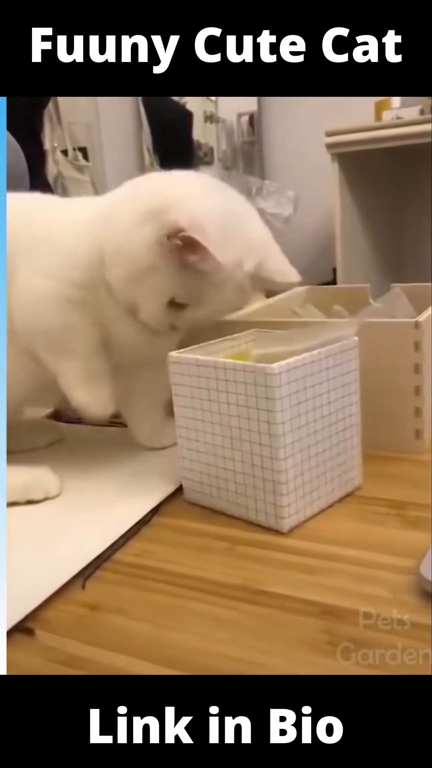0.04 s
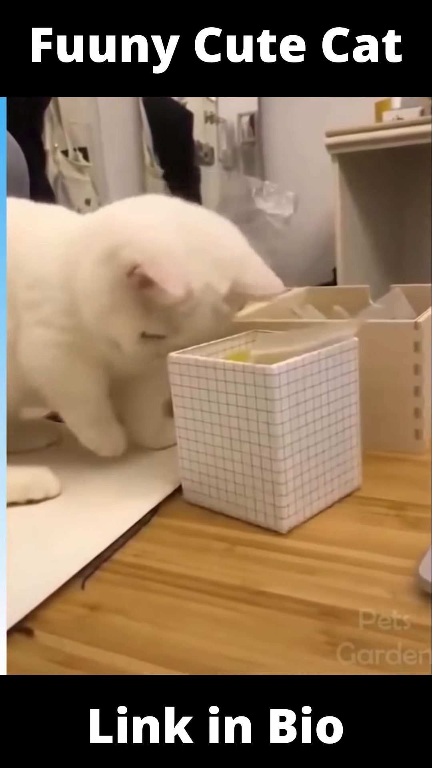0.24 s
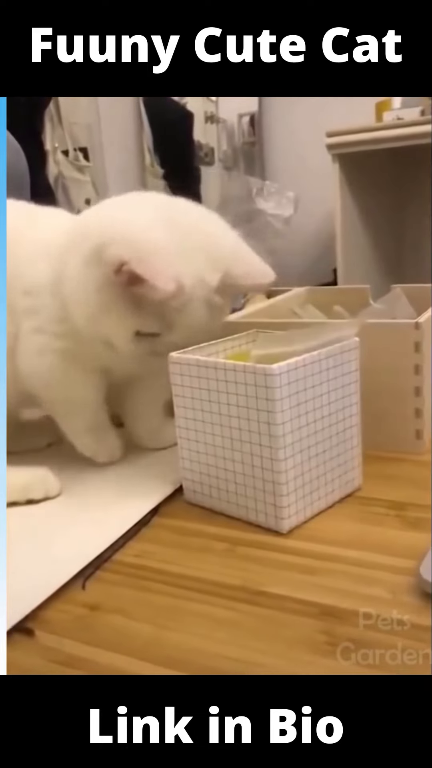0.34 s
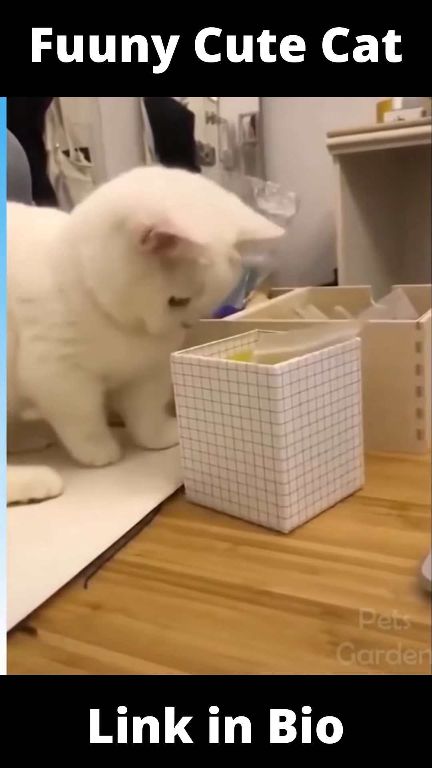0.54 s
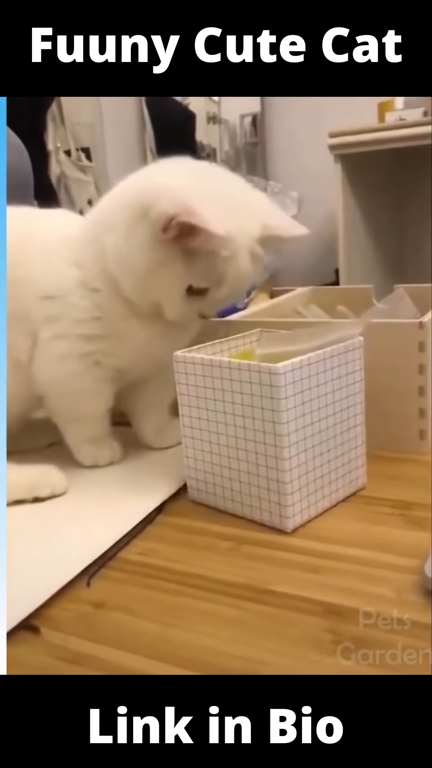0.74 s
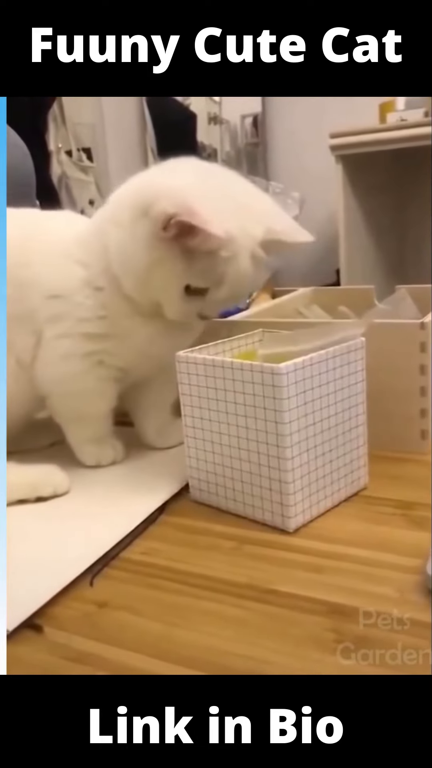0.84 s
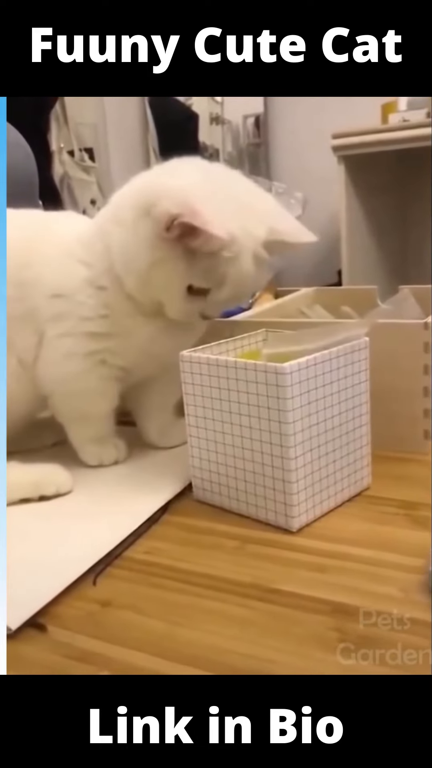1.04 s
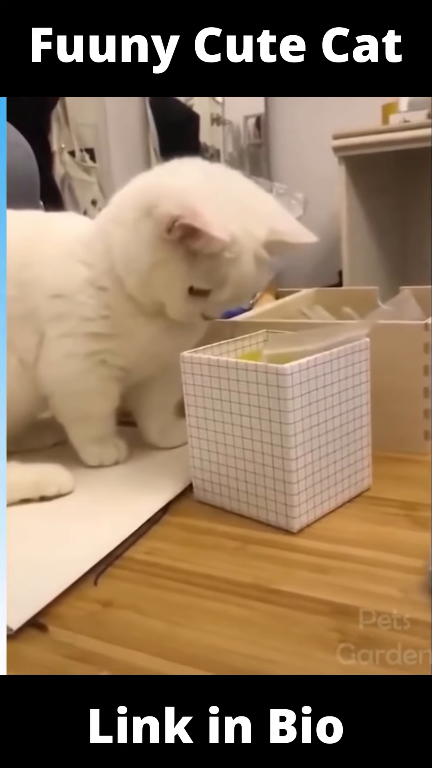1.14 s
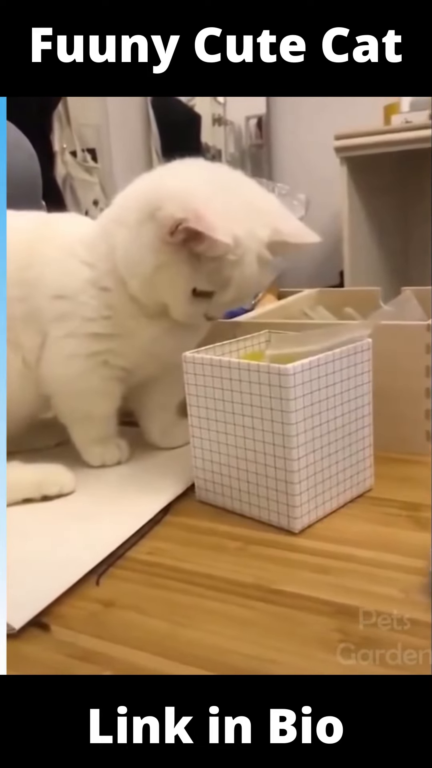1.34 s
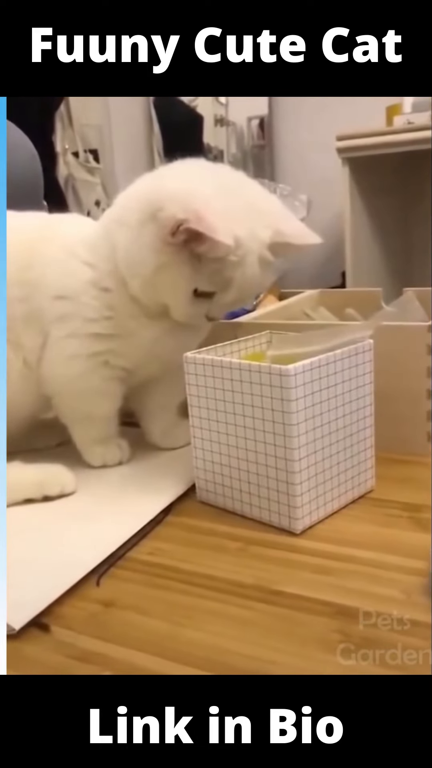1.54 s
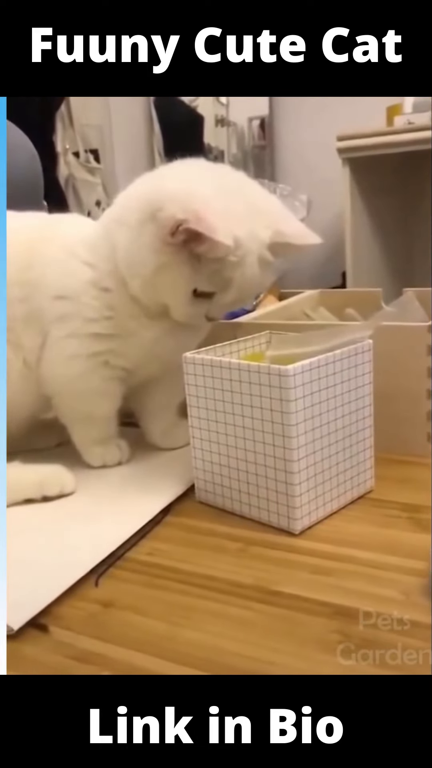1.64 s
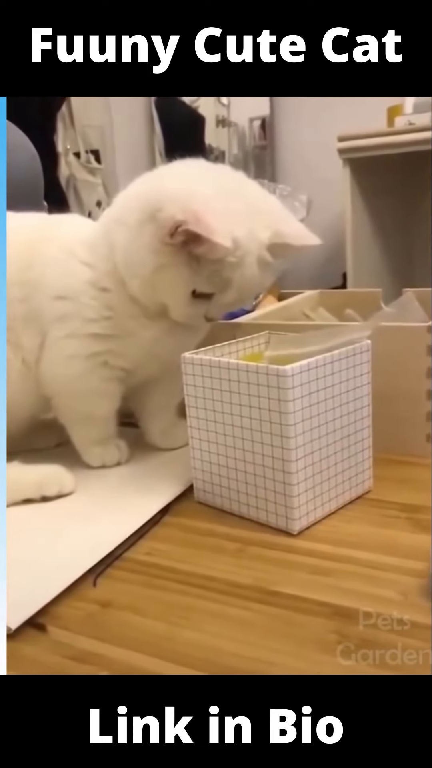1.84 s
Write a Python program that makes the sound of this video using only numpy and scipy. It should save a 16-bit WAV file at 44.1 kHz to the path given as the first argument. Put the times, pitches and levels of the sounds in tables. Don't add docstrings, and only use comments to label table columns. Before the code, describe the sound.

A small cardboard box knocks down on a wooden desk, a hard toy rattling inside it

```python
import sys
import numpy as np
from scipy import signal
from scipy.fft import rfft, irfft
from scipy.io import wavfile
from scipy.ndimage import uniform_filter1d

SR = 44100
rng = np.random.default_rng(int(sys.argv[2]) if len(sys.argv) > 2 else 0)


def master(y):
    cut = np.clip(np.atleast_2d(y).T, -1, 1)
    pcm = np.round(cut * 32767)
    wavfile.write(sys.argv[1], SR, pcm.astype(np.int16))


def elevation(decibels):
    levels = np.asarray(decibels, float)
    return 10 ** (levels / 20)


N = 83790

# mode_hz, level_db, t60_s
TOY = [(900, 0.5, 0.015), (1273, -5, 0.019), (1720, 2, 0.022), (1940, -2, 0.033), (2150, -2, 0.013),
       (2600, -2, 0.0096), (2990, -6, 0.032), (3773, -3, 0.021), (4240, -8, 0.012), (5150, -25, 0.01),
       (6140, -8, 0.0057), (7780, -33, 0.008), (9230, -24, 0.008)]


def evened(x):
    return x / np.sqrt(np.mean(x ** 2) + 1e-20)


def read(points, hz):
    f, value = np.transpose(points)
    return np.interp(np.log(hz + 1), np.log(f + 1), value)


def colour(x, points):
    gain = elevation(read(points, np.fft.rfftfreq(len(x), 1 / SR)))
    return irfft(rfft(x) * gain, len(x))


def add(mix, start_s, sound):
    part = mix[round(start_s * SR):][:len(sound)]
    part += sound[:len(part)]


def band(x, hz, width_hz):
    r = np.exp(-np.pi * width_hz / SR)
    return signal.lfilter([1, 0, -1], [1, -2 * r * np.cos(2 * np.pi * hz / SR), r * r], x)


def ring(modes, t, gain_db=0):
    hz, level_db, t60_s = np.transpose(modes)[:, :, None]
    decay_db = -60 * t / np.maximum(t60_s, .003)
    return elevation(level_db + gain_db + decay_db) * np.sin(2 * np.pi * hz * t)


def burst(points, t60_s, noise):
    t = np.arange(len(noise)) / SR
    return evened(colour(noise, points)) * elevation(-60 * t / t60_s) * np.minimum(t * 1500, 1)


def air():
    # freq_hz, level_db
    hiss_colour = [(100, 2.5), (250, 1), (450, -7.5), (1000, -4.5), (2200, -18), (5000, -24.5),
                   (13000, -26.5), (13600, -76)]
    # freq_hz, level_db
    rumble_colour = [(12, -39), (22, -0.5), (43, -3.5), (60, -3), (77, -7.5), (100, -23), (200, -58)]
    hiss_db, patchy_db, rumble_db = -60.5, 1.3, -54.5
    hum_hz, hum_db, hum_wobble, octave_db = 135, -53, 0.074, -18.5

    _, _, z = signal.stft(rng.standard_normal(N), SR, nperseg=512)
    patches = uniform_filter1d(rng.standard_normal(z.shape), 6, 0)
    patches = evened(uniform_filter1d(patches, 8, 1))
    patchy = signal.istft(z * elevation(patchy_db * patches), SR, nperseg=512)[1][:N]
    hiss = colour(patchy, hiss_colour)
    hiss /= np.std(signal.lfilter(*signal.butter(4, 200, "high", fs=SR), hiss))

    rumble = evened(colour(rng.standard_normal(N), rumble_colour))

    slow = uniform_filter1d(rng.standard_normal((2, N)), 3000)
    slow = evened(uniform_filter1d(slow, 3000))
    phase = 2 * np.pi * hum_hz * np.arange(N) / SR + hum_wobble * slow[0]
    tones = np.sin(phase) + elevation(octave_db) * np.sin(2 * phase)
    hum = np.sqrt(2) * (1 + hum_wobble * slow[1]) * tones
    return elevation(hiss_db) * hiss + elevation(rumble_db) * rumble + elevation(hum_db) * hum


def rattle():
    # time_s, level_db, tilt_db_per_octave
    shake = [(0, -59, 2), (0.049, -75, -8), (0.152, -68.5, -9), (0.202, -80.5, -14), (0.219, -50.5, -3),
             (0.242, -60, -10.5), (0.26, -54, 10), (0.29, -25.5, 3.5), (0.302, -32, -0.5),
             (0.357, -40, -0.5), (.42, -53.5, -5.5), (0.499, -52.5, -2.5), (0.599, -56.5, -1),
             (.66, -63, -1.5), (.72, -63.5, -1), (.77, -73, -9), (.81, -66.5, -4), (1.0, -78.5, -5)]
    # freq_hz, level_db
    rustle_colour = [(200, 0.5), (700, -1.5), (2000, 0.5), (4200, 0), (6500, -9.5), (9000, -13),
                     (12500, -15.5), (15000, -52)]
    hits_per_s, spread_db, rustle_db = 900, 4.5, 2

    t = np.arange(N) / SR
    time_s, level_db, tilt_db = np.transpose(shake)
    level_db = np.interp(t, time_s, level_db, left=-120, right=-120)
    tilt_db = np.interp(t, time_s, tilt_db, left=-120, right=-120)
    tilt_db = np.clip(tilt_db, -9, 9)

    hits = elevation(spread_db * np.minimum(rng.exponential(1, N), 2.5))
    hits = hits * (rng.random(N) < hits_per_s / SR) * rng.choice([-1, 1], N)

    which = rng.integers(0, len(TOY), (2, N))
    taps = ring(TOY, t[:2000]) * elevation(-1500 * t[:2000])
    parts = [signal.oaconvolve(hits * (which == k).any(0), tap)[:N] for k, tap in enumerate(taps)]
    tilted = sum(p * elevation(tilt_db * np.log2(mode[0] / 2500)) for p, mode in zip(parts, TOY))
    toy = tilted / np.std(sum(parts))

    paper = evened(colour(hits + 0.28 * rng.standard_normal(N), rustle_colour))
    dull = signal.lfilter(*signal.butter(1, 2500, fs=SR), paper)
    paper = dull * elevation(-tilt_db) + (paper - dull) * elevation(tilt_db)
    return elevation(level_db) * (toy + elevation(rustle_db) * paper)


def slips():
    # start_s, peak_db, centre_hz, ring_over_puff_db, t60_s
    events = [(0.075, -49, 3600, 3, .02), (0.0835, -37, 3700, -4, 0.0097), (0.0985, -39.5, 3700, -9, 0.026),
              (0.1114, -38.5, 3520, -15, 0.014), (.124, -42, 4100, -5.5, 0.018),
              (0.1338, -39, 2050, -5, 0.024), (0.14, -54, 4000, -13, 0.017),
              (0.151, -37.5, 4040, -7, 0.027), (0.156, -38.5, 1950, 1, 0.024),
              (0.1671, -28.5, 4630, 5.5, 0.011), (0.18, -39, 4500, -2, 0.011),
              (0.1836, -27, 6640, -4, 0.017), (0.2114, -34, 4500, 1, 0.012), (0.214, -36, 2400, 13, 0.034),
              (.218, -30.5, 1300, 8, .04), (.222, -43, 2300, 5.5, .03), (0.226, -42, 12500, 9, 0.023),
              (0.2274, -34.5, 4350, -8, 0.01), (0.229, -30, 1850, 0, 0.015), (0.68, -58, 11500, -2, 0.023),
              (.814, -52, 4040, 3, 0.017), (0.837, -44.5, 3970, -6, 0.021), (1.105, -53, 6800, -4, .012),
              (1.271, -53.5, 4330, -2, .015), (1.305, -56, 4180, -2, 0.032),
              (1.3953, -44, 4100, -16, 0.015), (1.401, -50.5, 1650, 6, 0.15), (1.417, -54, 4000, -4, 0.018)]
    # freq_hz, level_db
    puff_colour = [(500, -23), (1500, -2.5), (3500, -0.5), (6500, -6), (8000, -16.5), (10000, -11.5),
                   (13000, -20), (15000, -49)]
    width_hz = 350

    out = np.zeros(N)
    noise = rng.standard_normal((len(events), 3072))
    for (start_s, peak_db, centre_hz, ring_db, t60_s), z in zip(events, noise):
        puff = burst(puff_colour, max(t60_s, .004), z)
        rung = band(puff, centre_hz, width_hz)
        puff = puff + elevation(ring_db) * rung * np.linalg.norm(puff) / np.linalg.norm(rung)
        add(out, start_s, elevation(peak_db) * puff / abs(puff).max())
    return out


def knock():
    # mode_hz, level_db, t60_s
    box = [(68, -16.5, 0.36), (149, -28, 0.067), (194.3, 1, 0.27), (935, -15, 0.14), (345.6, -3.5, 0.12),
           (503, 2, 0.024), (573, -4.5, 0.063), (613.3, -12.5, 0.16), (726.7, -7.5, 0.15),
           (856, -12.5, 0.23), (1014, 3.5, 0.025), (1184, -7.5, 0.033), (1650, -6.5, 0.036),
           (2220, -12.5, 0.023)]
    # freq_hz, level_db
    thud_colour = [(40, -45), (75, -16), (110, -9), (220, -15), (550, -6), (1000, -11.5), (3000, -29.5),
                   (15000, -79.5)]
    # freq_hz, level_db
    crack_colour = [(300, -36), (1000, -18), (2000, 2.5), (3300, -5.5), (5500, -5.5), (8000, -14.5),
                    (12000, -12), (15000, -36)]
    # start_s, level_db, wall_hz, t60_s
    rocks = [
        (0.2694, -18.5, 351.2, 0.21),
        (.310, -31, 194, 0.41),
        (.366, -37.5, 197.5, 0.15),
        (.39, -39.5, 641, 0.12),
        (0.844, -52, 250, 0.045),
    ]
    knock_s, knock_db, rise_cycles, rock_rise_s = .2462, -11.5, 0.77, 0.0027
    thud_db, thud_t60_s, crack_db, crack_t60_s = -20.5, 0.28, -19.5, 0.024
    choke_s, choke_db, choke_hz = 0.0326, -12.5, 250

    t, out = np.arange(SR // 2) / SR, np.zeros(N)
    mode_hz = np.array(box)[:, :1]
    rise = 1 - np.exp(-(t * mode_hz / rise_cycles) ** 2)
    landed = np.clip((t - choke_s) / 0.011 + .5, 0, 1)
    choke = elevation(choke_db * (mode_hz < choke_hz) * landed)
    sign = (-1) ** np.arange(len(box))[:, None]
    modes = (ring(box, t) * rise * choke * sign).sum(0)
    add(out, knock_s - .0003, -elevation(knock_db) * modes)

    for start_s, level_db, wall_hz, t60_s in rocks:
        rock = ring([(wall_hz, level_db, t60_s)], t)[0]
        add(out, start_s, rock * (1 - np.exp(-t / rock_rise_s)))

    thud = burst(thud_colour, thud_t60_s, rng.standard_normal(16384))
    crack = burst(crack_colour, crack_t60_s, rng.standard_normal(2048))
    add(out, knock_s, elevation(thud_db) * thud)
    add(out, knock_s, elevation(crack_db) * crack)
    return out


def bounces():
    # start_s, level_db, tilt_db_per_octave, favoured_hz
    events = [(0.274, -34, -7, 2150), (.2875, -27, -3, 4180), (.292, -23.5, 12, 2150),
              (0.2988, -21, -1, 3750), (0.328, -19, 2.5, 3750), (0.3535, -23, 4, 3200),
              (0.3737, -22, 1, 1940), (0.386, -23.5, 2.5, 2960), (0.397, -32, -11, 2600),
              (0.4062, -36, 2, 3750), (0.425, -32, -5, 1940), (0.4505, -19.5, 2, 3750),
              (0.464, -25.5, 3.5, 1730), (.476, -40.5, 16.5, 3840), (.486, -38, -1, 3750),
              (0.494, -35, -6, 1720), (0.5134, -20, 4, 900), (0.523, -30, 13, 3750),
              (0.537, -31.5, -4, 2990), (0.5545, -24, 1.5, 900), (0.572, -32, -3.5, 3750),
              (0.593, -36, -11, 900), (0.629, -38.5, -0.5, 3750), (.634, -34.5, 1, 900),
              (0.682, -42, 6.5, 1780), (.698, -37.5, -1.5, 900), (0.7467, -27, -1.5, 900),
              (.762, -37.5, 3, 1720), (.847, -42.5, 2, 900), (1.151, -35.5, -4, 900),
              (0.313, -28, 2.5, 2150)]
    # freq_hz, level_db
    tick_colour = [(500, -62), (1000, 0), (4000, -2.5), (7000, -16), (9500, -8.5), (13000, -12),
                   (15000, -60)]
    favour_db, contact_s, luck_db = 8.5, 0.0027, 0.39
    tick_db, tick_t60_s = -16, 0.022

    t, out = np.arange(3000) / SR, np.zeros(N)
    mode_hz = np.array(TOY)[:, :1]
    luck = rng.standard_normal((len(events), len(TOY), 2))
    noise = rng.standard_normal((len(events), 3000))
    contact = np.sin(np.pi * np.minimum(t[:200] / contact_s, 1) ** 0.11)
    for (start_s, level_db, tilt_db, favoured_hz), u, z in zip(events, luck, noise):
        favour = np.exp(-(4 * np.log2(mode_hz / favoured_hz)) ** 2)
        shade_db = tilt_db * np.log2(mode_hz / 2000) + favour_db * favour
        rung = ring(TOY, t, shade_db + luck_db * u[:, :1])
        pushes = contact * np.cos(2 * np.pi * mode_hz * t[:200]) * np.sign(u[:, 1:])
        hit = signal.oaconvolve(rung, pushes, axes=1).sum(0)[:3000]
        tick = elevation(tick_db + tilt_db) * burst(tick_colour, tick_t60_s, z)
        add(out, start_s, elevation(level_db) * (4 * hit / np.linalg.norm(hit) + tick))
    return out


def scuff():
    # centre_hz, width_hz, level_db
    resonances = [(386, 250, 6.5), (2950, 140, 5.5), (4100, 230, -1.5), (5100, 160, 1.5), (5700, 190, -6),
                  (8600, 1400, -28)]
    start_s, length_s, scuff_db = .81, .22, -59.5

    z, out = rng.standard_normal(SR // 2), np.zeros(N)
    u = np.minimum(np.arange(len(z)) / SR / length_s, 1)
    fur = sum(elevation(level_db) * evened(band(z, centre_hz, width_hz)) * np.sqrt(width_hz)
              for centre_hz, width_hz, level_db in resonances)
    add(out, start_s, elevation(scuff_db) * evened(fur) * np.sin(np.pi * u ** .65))
    return out


def room(x):
    # freq_hz, t60_s
    decay = [(100, 0.26), (500, 0.33), (2000, 0.19), (6000, 0.084), (11500, 0.36), (13300, 0.26),
             (14000, 0.09)]
    taps = np.zeros(SR)
    at = np.arange(200, SR - 20, 20)
    taps[at + rng.integers(0, 20, len(at))] = rng.choice([-1., 1.], len(at))
    hz, t, z = signal.stft(taps, SR, nperseg=256)
    t60_s = np.maximum(read(decay, hz), .05)[:, None]
    tail = signal.istft(z * elevation(-60 * t / t60_s), SR, nperseg=256)[1]
    return signal.fftconvolve(x, tail / np.linalg.norm(tail))[:N]


def scene():
    room_db = -8.5
    near = slips() + knock() + bounces() + rattle() + scuff()
    return (near + elevation(room_db) * room(near) + air())[None]


def band_limit(x):
    return signal.sosfilt(signal.butter(12, 15330, fs=SR, output="sos"), x)


def record(dry):
    # freq_hz, level_db
    response = [(5500, -0.5), (7600, -2), (9000, -3), (10300, -7), (12000, -2)]
    edge_hz = 14900
    limit = signal.cheby2(12, 50, edge_hz, fs=SR, output="sos")
    x = signal.sosfilt(limit, colour(dry[0], response))[None]
    return band_limit(x)


dry = scene()
out = record(dry)
master(out)
```